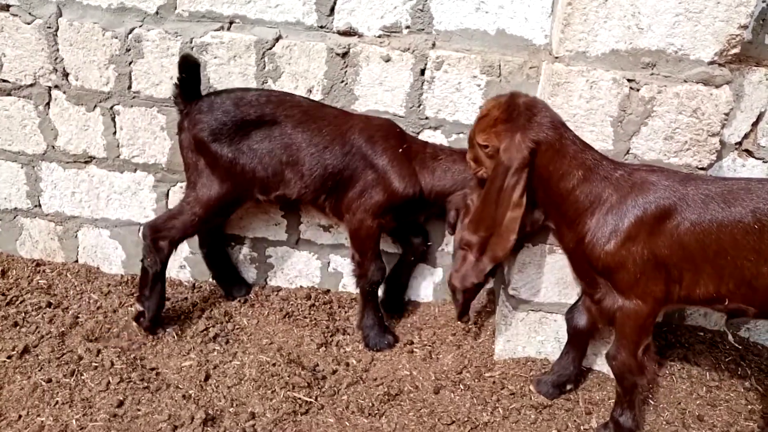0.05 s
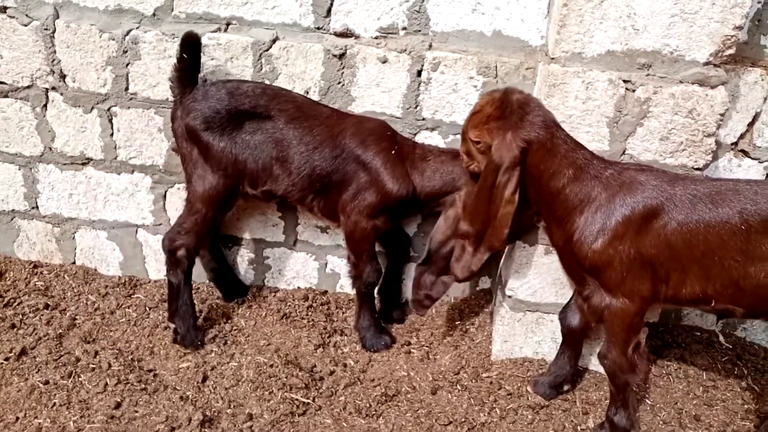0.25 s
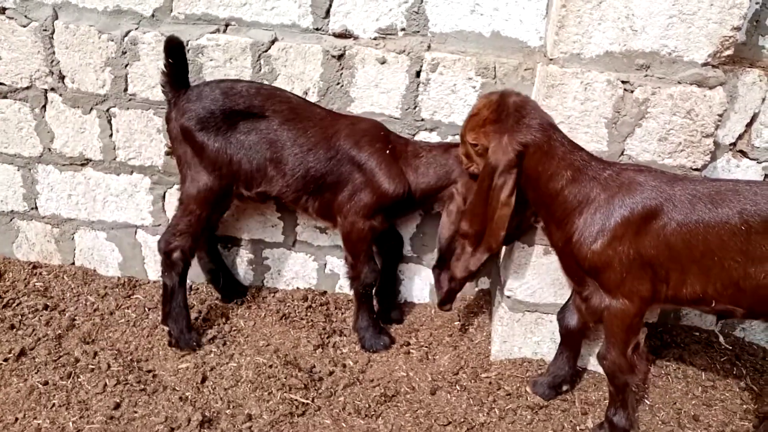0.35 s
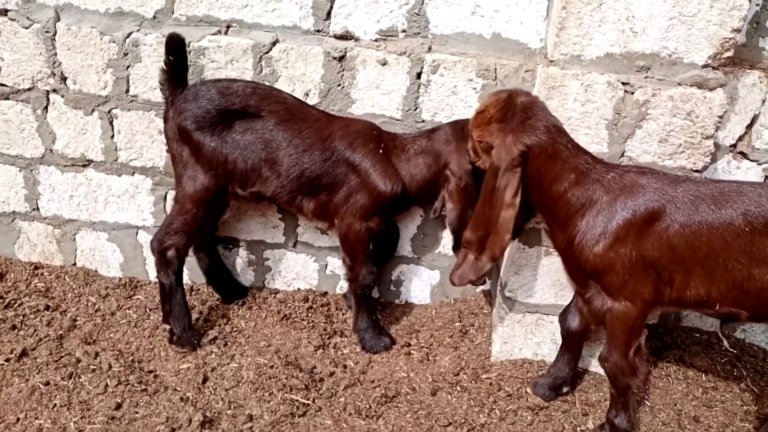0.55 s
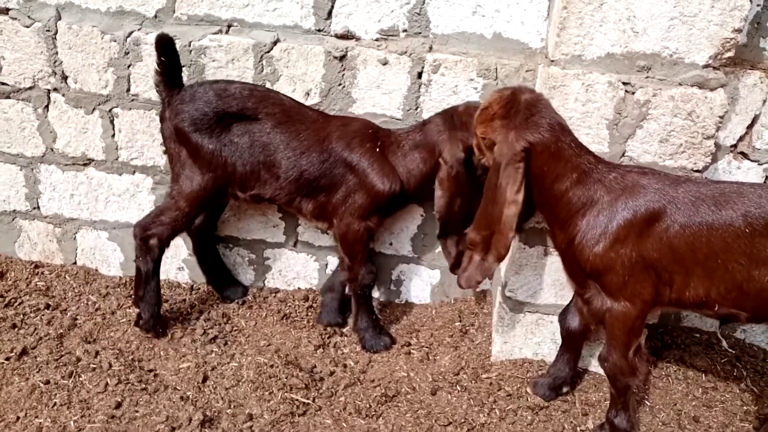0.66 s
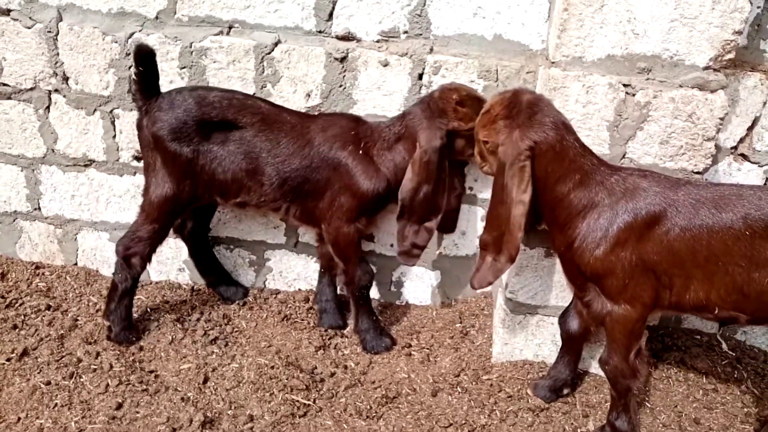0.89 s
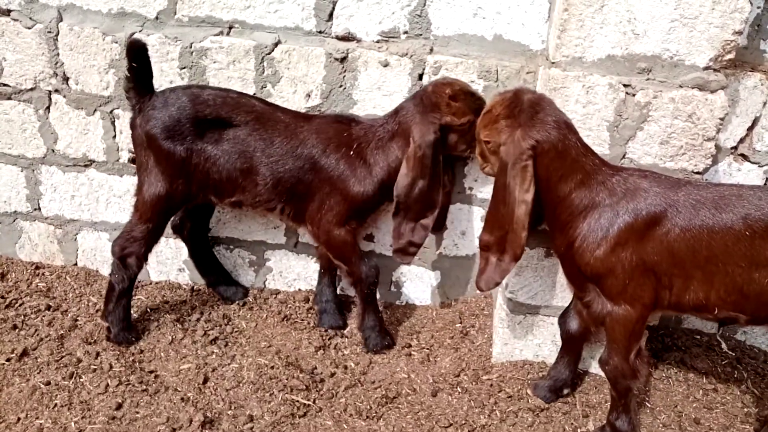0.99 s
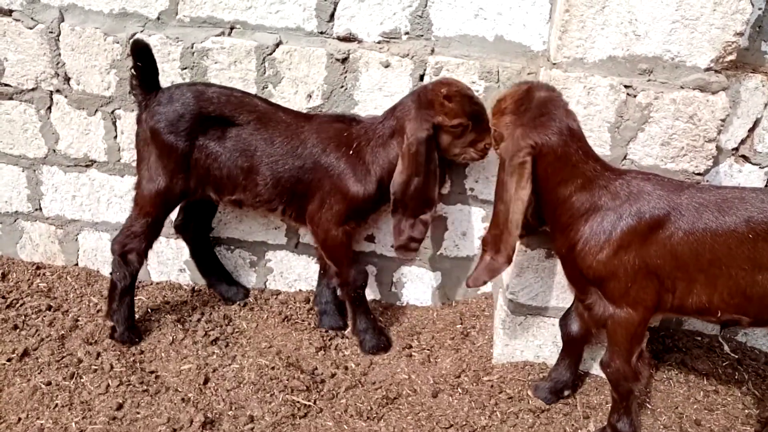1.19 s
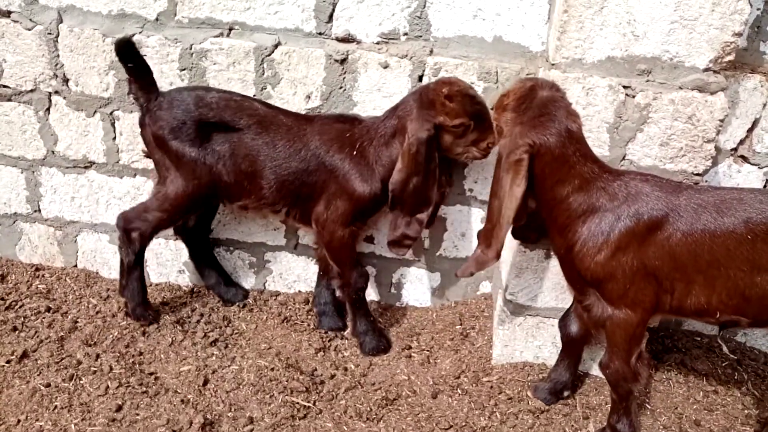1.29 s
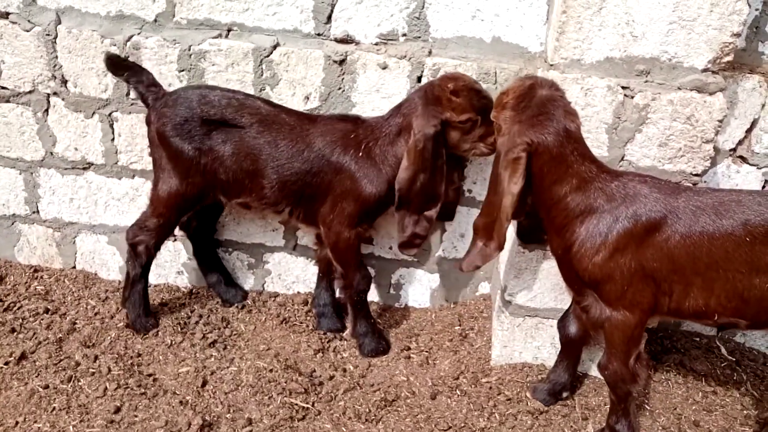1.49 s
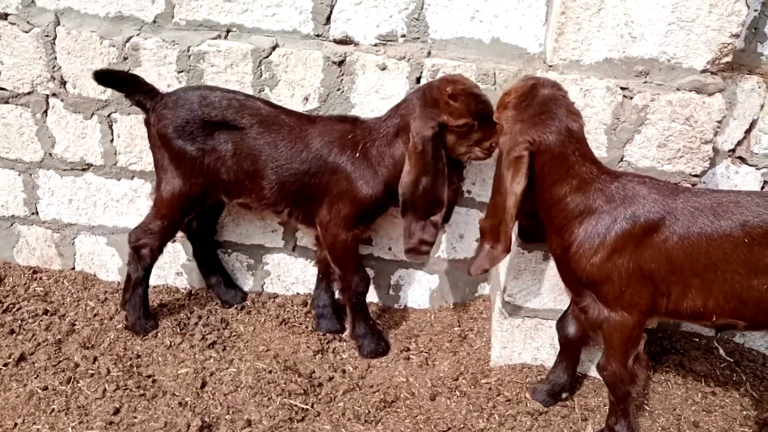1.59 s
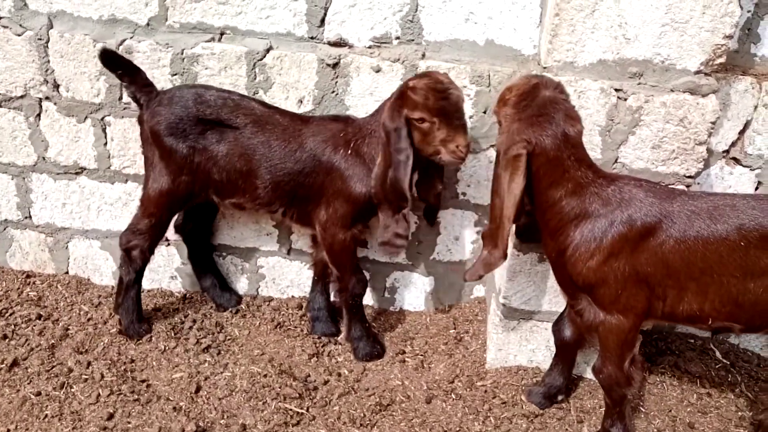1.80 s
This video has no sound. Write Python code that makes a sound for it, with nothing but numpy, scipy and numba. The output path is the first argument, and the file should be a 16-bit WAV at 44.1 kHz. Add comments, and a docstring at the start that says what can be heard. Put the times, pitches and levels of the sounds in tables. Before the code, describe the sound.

A goat gives one long, harsh bleat close by on the right, starting hoarse and ending in a quavering rasp. Faint bird chirps and soft hoof scuffs sound around it in a stone-walled yard with a low rumble.

```python
"""A hoof knocks in a stone-walled yard over a faint low rumble, and a small bird chirps farther off.
Off to the right a goat gives one long harsh bleat, its vocal folds pulsing through a resonant throat.
The voice scoops up hoarsely over a scuff of dirt, settles on a clean low pitch, then sags and breaks
into a quavering rasp as a bird chirps again. After it come a crunch of straw, two more chirps
and hooves shuffling softly in the dry dirt."""
import sys
import numpy as np
from scipy import signal
from scipy.fft import rfft, irfft
from scipy.io import wavfile
from scipy.ndimage import map_coordinates
from numba import njit

SR = 44100
rng = np.random.default_rng(int(sys.argv[2]) if len(sys.argv) > 2 else 0)


def store_pcm(level_fs):
    """Save levels as 16-bit WAV."""
    pcm = np.round(np.clip(level_fs, -1, 1) * 32767).astype(np.int16)
    wavfile.write(sys.argv[1], SR, np.atleast_2d(pcm).T)


N = 81585
TIME_S = np.arange(N) / SR
BIN_HZ = np.maximum(np.arange(N + 1) * SR / (2 * N), 1)


def undb(db):
    return 10 ** (np.asarray(db) / 20)


def unit(x):
    return x / np.sqrt(np.mean(x ** 2) + 1e-20)


def curve(rows, column=1):
    """An envelope: one column of a table, joined by straight lines in time."""
    rows = np.array(rows)
    return np.interp(TIME_S, rows[:, 0], rows[:, column])


def swell(start_s, length_s):
    """A rounded rise and fall."""
    return np.sin(np.pi * np.clip((TIME_S - start_s) / length_s, 0, 1))


def wander(hz):
    """Smooth random motion with spread 1."""
    return unit(np.interp(TIME_S * hz, np.arange(N), rng.standard_normal(N)))


def per_bin(rows, column=1):
    """One column of a table, spread over the spectrum on a log frequency scale."""
    rows = np.array(rows)
    return np.interp(np.log(BIN_HZ), np.log(rows[:, 0]), rows[:, column])


def equalise(x, eq):
    """Filter by a (freq_hz, gain_db) curve."""
    return irfft(rfft(x, 2 * N) * undb(per_bin(eq)))[:N]


def noise(eq):
    return unit(equalise(rng.standard_normal(N), eq))


def delay(x, seconds):
    return map_coordinates(x, [np.arange(N) - seconds * SR], order=3)


@njit
def bandpass(x, hz, width_hz):
    """State-variable band-pass with a moving centre."""
    y, band, low = np.empty(len(x)), 0., 0.
    for i in range(len(x)):
        tuning, damping = np.tan(np.pi * hz[i] / SR), width_hz / hz[i]
        v = (band + tuning * (x[i] - low)) / (1 + tuning * (tuning + damping))
        band, low = 2 * v - band, low + 2 * tuning * v
        y[i] = damping * v
    return y


def resonate(x, hz, width_hz):
    """A band-pass applied twice, for steep skirts."""
    hz = hz * np.ones(N)
    return bandpass(bandpass(x, hz, float(width_hz)), hz, float(width_hz))


# Shadow on the left channel: freq_hz, gain_db, lag_s
LEFT_SHADOW = [(100, -3.5, .00085), (400, -3.8, .0012), (600, -3.8, .00115), (670, -6.5, .0007),
               (1300, -6, .00084), (2300, -10.5, .00084), (4200, -9, .00084), (8000, -12, .00084)]

def to_left(x):
    """Sound from the right reaches the left later and duller, by a lag that varies with frequency."""
    lag = np.exp(-2j * np.pi * BIN_HZ * per_bin(LEFT_SHADOW, column=2))
    return irfft(rfft(x, 2 * N) * undb(per_bin(LEFT_SHADOW)) * lag)[:N]


# Slaps off the nearby walls: delay_s, gain_db
WALL_ECHOES = [(.0075, -13), (.0298, -10.5)]
# Tone of the reverb tail: freq_hz, gain_db
TAIL_EQ = [(100, -13), (650, -8), (1400, -1), (2200, 2), (4000, 3), (12000, 3)]

def yard(x, wet_db):
    """Places a source on the right, among stone walls that return echoes and a short diffuse tail."""
    t60_s, build_s = .42, .0041
    fade = np.exp(-np.log(1000) * TIME_S / t60_s) * (1 - np.exp(-TIME_S / build_s))
    early = x + sum(undb(db) * delay(x, seconds) for seconds, db in WALL_ECHOES)
    send = undb(wet_db) * equalise(x, TAIL_EQ)
    impulses = [unit(rng.standard_normal(N) * fade) / np.sqrt(N) for _ in range(2)]
    left, right = (signal.fftconvolve(send, impulse)[:N] for impulse in impulses)
    return np.array([to_left(early + left), early + right]) / np.hypot(1, undb(wet_db))


# Ride of the low rustle and rumble: time_s, level_db
RUMBLE_LEVEL = [(0, -47.5), (.15, -49.5), (.3, -41.5), (.5, -51), (.95, -60), (1.2, -52.5), (1.33, -60.5),
                (1.42, -75), (1.6, -69), (1.85, -68.5)]
# Tone of the rumble: freq_hz, gain_db
RUMBLE_EQ = [(20, -32), (45, -17), (90, 8), (160, 5), (250, 8.5), (400, 8), (800, -3.5), (1700, -23),
             (2600, -44), (8000, -38)]
# Wash of distant birds and yard hiss: freq_hz, gain_db
HISS_EQ = [(100, 14.5), (500, -6), (1200, -3), (2500, -0.5), (3600, 8), (5000, 10.5), (6100, 7.5),
           (7200, -5), (10000, -13), (13000, -35), (15500, -8)]

def background():
    """The bed: a low rumble common to both sides, under a diffuse, faintly flickering hiss."""
    hiss_db, flicker_db = -62, 1
    rumble = noise(RUMBLE_EQ) * undb(curve(RUMBLE_LEVEL))
    left, right = (noise(HISS_EQ) * undb(hiss_db + flicker_db * wander(hz=12.37)) for _ in range(2))
    return np.array([to_left(rumble) + undb(-11.5) * left, rumble + right])


# Bird calls: start_s, length_s, first_pitch_hz, last_pitch_hz, level_db
BIRD_CHIRPS = [(.114, 0.098, 6040, 3240, -51.5), (0.95, 0.15, 5480, 3510, -54),
               (1.341, .18, 5710, 5320, -57.5), (1.77, 0.1, 6154, 3086, -52)]

def birds():
    """Falling whistles, made harsh by a fast, irregular warble."""
    out = 0
    for start, length, first_hz, last_hz, db in BIRD_CHIRPS:
        glide_hz = curve([(start, first_hz), (start + length, last_hz)])
        hz = glide_hz * (1 + .085 * wander(hz=805))
        whistle = unit(np.sin(2 * np.pi * np.cumsum(hz) / SR))
        out = out + undb(db) * swell(start, length) * whistle
    return out


# Hooves dragging in dirt: start_s, length_s, level_db
HOOF_SCUFFS = [(0.276, 0.051, -46), (1.263, 0.034, -70.5), (1.711, .047, -60)]
# Tone of dry grit: freq_hz, gain_db
GRIT_EQ = [(500, -36), (2500, -9.5), (6500, 0.5), (9000, -10), (12000, -33), (15000, -23)]

def scuffs():
    """Hooves scrape dry dirt in short swells of bright, grainy noise."""
    spread_db = 3
    grains = rng.standard_normal(N) * undb(spread_db * wander(hz=1100))
    grit = unit(equalise(grains, GRIT_EQ))
    return grit * sum(undb(db) * swell(start, length) for start, length, db in HOOF_SCUFFS)


# Tone of crunching straw: freq_hz, gain_db
STRAW_EQ = [(2000, -4), (6000, -15), (8000, -1), (11000, -11), (12500, -20)]

def straw():
    """Straw crunches in one small, crisp tick."""
    return undb(-56) * swell(start_s=1.289, length_s=.008) * noise(STRAW_EQ)


# Soft bumps: start_s, centre_hz, decay_s, level_db
HOOF_KNOCKS = [(0, 1280, 0.01, -48), (0, 431, 0.065, -44), (1.569, 464, 0.028, -54.5),
               (1.64, 213, 0.015, -54.5)]

def knocks():
    """Hooves and bodies knock dully, each a band of noise that dies away fast."""
    attack_s = .0026
    out = 0
    for start, hz, decay_s, db in HOOF_KNOCKS:
        age = np.maximum(TIME_S - start, 0)
        envelope = (1 - np.exp(-age / attack_s)) * np.exp(-age / decay_s)
        body = unit(resonate(rng.standard_normal(N), hz, width_hz=.28 * hz))
        out = out + undb(db) * envelope * body
    return out


# Ride of the breath: time_s, level_db
BREATH_LEVEL = [(.19, -61), (.25, -47.5), (.31, -50), (.4, -52), (.5, -54), (.8, -57.5), (1.0, -53),
                (1.13, -51), (1.24, -68), (1.3, -63)]
# Tone of the breathy hiss: freq_hz, gain_db
BREATHY_HISS_EQ = [(300, -48), (1500, -10.5), (2600, -14.5), (3200, -10.5), (4200, -16), (6500, -14.5),
                   (8500, -21.5), (10000, -28.5), (11000, -98), (15000, -56)]

def breath(puffs):
    """Air rushes through the goat's mouth, hissing once per cycle of the folds."""
    return puffs * noise(BREATHY_HISS_EQ) * undb(curve(BREATH_LEVEL))


# Tone of the rasp: freq_hz, gain_db
RASP_EQ = [(100, -20), (700, -15), (1400, 0), (2400, 1), (4000, -2), (8000, -3)]

def vocal_folds(phase, hz, rough, puffs):
    """One sharp pulse per cycle; hoarseness makes the pulses uneven and blends in puffs of noise."""
    shimmer_db = 3 * rough
    rasp_gain = undb(9) * rough
    pulses = np.sinc((phase - .5) * SR / hz / 2) * np.sin(np.pi * phase) ** 2
    pulses = unit(pulses * undb(shimmer_db * wander(hz.mean())))
    return (pulses + rasp_gain * puffs * noise(RASP_EQ)) / np.hypot(1, rasp_gain)


# Middle throat resonances: first_hz, sagged_hz, width_hz, relative_db
THROAT_MIDS = [(870, 780, 430, 1.5), (1378, 1363, 199, 12.5)]
# Upper throat resonances: first_hz, sagged_hz, width_hz, relative_db
THROAT_HIGHS = [(2034, 2163, 373, 3), (2482, 2420, 80, -1), (3064, 3900, 133, -17),
                (4260, 3820, 680, -19.5), (6200, 3500, 1760, -34.5)]
# Swell and quaver of the bleat: time_s, mids_level_db, highs_level_db
THROAT_LEVELS = [(.1, -100, -100), (.17, -72.5, -70), (.21, -46, -44.5), (.25, -40.5, -40), (.31, -33, -36),
                 (.4, -33, -35.5), (.56, -31.5, -34), (.63, -42, -38), (.69, -33.5, -32), (.79, -38, -38.5),
                 (.835, -32, -34), (.91, -41.5, -46.5), (.95, -32.5, -37), (1.01, -43.5, -41),
                 (1.06, -35, -33.5), (1.095, -61, -51.5), (1.125, -36.5, -36.5), (1.155, -38.5, -53),
                 (1.19, -53, -48.5), (1.255, -60, -60), (1.29, -100, -98)]

def throat(buzz):
    """The folds' buzz rings two groups of resonances, which slide as the call sags."""
    sag = curve([(.7, 0), (1.15, 1)])
    out = 0
    for column, formants in enumerate([THROAT_MIDS, THROAT_HIGHS], start=1):
        vowel = sum(undb(db) * resonate(buzz, first_hz + (sagged_hz - first_hz) * sag, width_hz)
                    for first_hz, sagged_hz, width_hz, db in formants)
        out = out + unit(vowel) * undb(curve(THROAT_LEVELS, column))
    return out


# Rides of the five lowest harmonics; the fifth carries the opening and last push: time_s, level_db
HARMONIC_1 = [(.16, -100), (.25, -49.5), (.45, -53.5), (.88, -54.5), (.97, -71), (1.08, -62.5), (1.25, -57),
              (1.36, -110)]
HARMONIC_2 = [(.2, -64), (0.301, -52.5), (.8, -58), (.89, -48), (1.2, -62)]
HARMONIC_3 = [(.25, -62), (0.541, -39), (.7, -51.5), (.83, -49), (0.929, -32), (.99, -38), (1.03, -55),
              (1.25, -60)]
HARMONIC_4 = [(.2, -54), (0.279, -35), (0.321, -30.5), (0.489, -32.5), (.63, -34.5), (0.722, -36.5),
              (0.832, -30), (0.888, -35), (0.942, -31.5), (1.0, -41.5), (1.06, -33), (1.171, -43.5),
              (1.22, -62.5)]
HARMONIC_5 = [(.17, -83), (.22, -51), (.245, -32), (.29, -35.5), (.35, -35.5), (.42, -41.5), (.72, -35),
              (.85, -38), (.96, -38), (1.02, -40.5), (1.065, -37), (1.13, -34.5), (1.168, -39), (1.19, -47),
              (1.26, -43), (1.29, -93)]
# A higher harmonic rings out as it meets a resonance: start_s, length_s, resonance_hz, level_db
OVERTONE_RINGS = [(0.343, 0.018, 2070, -28.5), (0.453, 0.094, 1350, -32.5), (0.658, 0.099, 1335, -32.5),
                  (1.034, 0.027, 1365, -39.5)]

def voice_body(phase, hz, rough):
    """Firm low harmonics that flutter and growl when hoarse, and higher ones that ring out briefly."""
    def harmonic(number):
        return unit(np.sin(2 * np.pi * number * phase))

    flutter_db = 5 * rough
    out = 0
    for number, levels in enumerate([HARMONIC_1, HARMONIC_2, HARMONIC_3, HARMONIC_4, HARMONIC_5], 1):
        out = out + harmonic(number) * undb(curve(levels) + flutter_db * wander(hz=70))
    # Noise in the lowest throat resonance follows the fifth harmonic's ride.
    growl = unit(resonate(rng.standard_normal(N), hz=570, width_hz=220))
    out = out + growl * rough * undb(curve(HARMONIC_5) - 4)
    for start, length, resonance_hz, db in OVERTONE_RINGS:
        envelope = swell(start, length)
        nearest = np.round(resonance_hz / hz[np.argmax(envelope)])
        out = out + undb(db) * envelope * harmonic(nearest)
    return out


# Scoop, hold and sag of the vocal folds: time_s, pitch_hz
BLEAT_PITCH = [(.2, 104.7), (.25, 111.4), (.29, 120.4), (.33, 127.3), (.39, 133.3), (.45, 135.1),
               (.52, 135.5), (.68, 134), (.76, 132.9), (.87, 129.7), (.95, 128.4), (1.01, 125.8),
               (1.12, 121.3), (1.27, 116.5)]
# Hoarseness, from 0 (clean) to 1: time_s, roughness
BLEAT_ROUGHNESS = [(.2, .5), (.3, .38), (.37, .22), (.45, .06), (.78, .06), (.95, .12), (1.02, .28),
                   (1.27, .6)]

def goat():
    """One bleat: the folds' cycle, jittery when hoarse, drives throat, breath and low harmonics."""
    rough = curve(BLEAT_ROUGHNESS)
    waver, jitter = .0016, .024 * rough  # shares of the pitch
    hz = curve(BLEAT_PITCH) * (1 + waver * wander(hz=25))
    phase = np.cumsum(hz * (1 + jitter * wander(hz.mean()))) / SR % 1
    puff_decay_cycles = .92
    puffs = unit(np.exp(-((phase + .5) % 1) / puff_decay_cycles))  # each starts on a fold pulse
    voice = throat(vocal_folds(phase, hz, rough, puffs)) + breath(puffs)
    release_s, release_db_per_s = 1.26, 394
    release = undb(-release_db_per_s * np.maximum(TIME_S - release_s, 0))
    edge = yard(voice * release, wet_db=3.5)
    body = yard(voice_body(phase, hz, rough) * release, wet_db=-1)
    return edge + body


def scene():
    """Goat, birds and hooves share the yard, over the background bed."""
    bleat = goat()
    chirps = yard(birds(), wet_db=-.5)
    hooves = yard(scuffs() + straw() + knocks(), wet_db=-5.5)
    return bleat + chirps + hooves + background()


def record(dry):
    """A steep low-pass trims the very top."""
    cutoff_hz = 15550
    return signal.sosfilt(signal.ellip(10, .2, 70, cutoff_hz, fs=SR, output="sos"), dry)


dry = scene()
out = record(dry)
store_pcm(out)
```